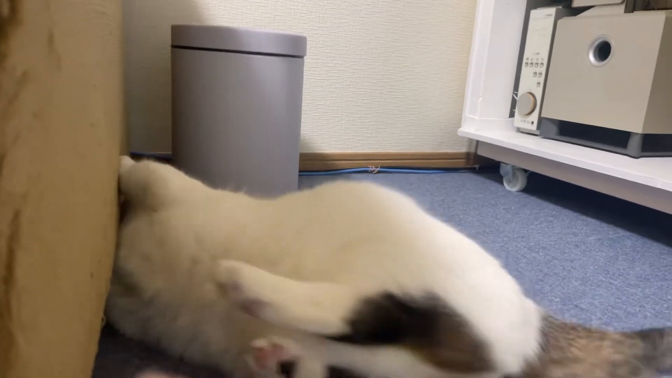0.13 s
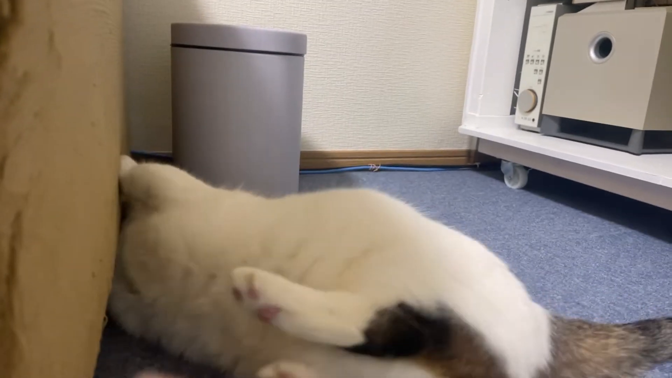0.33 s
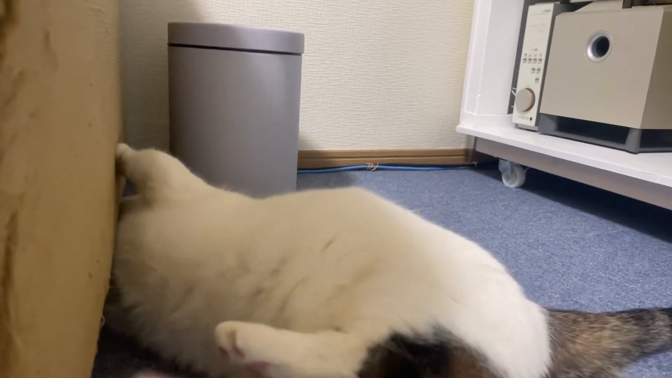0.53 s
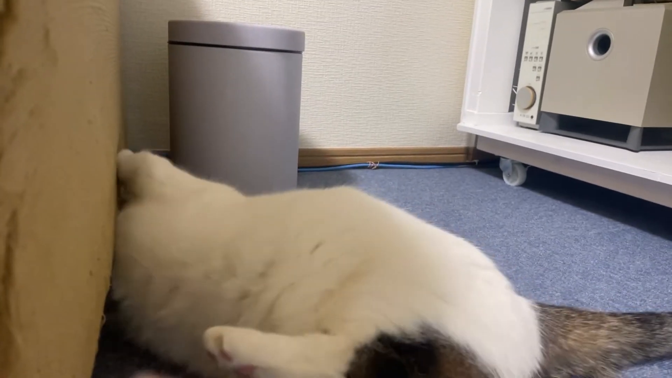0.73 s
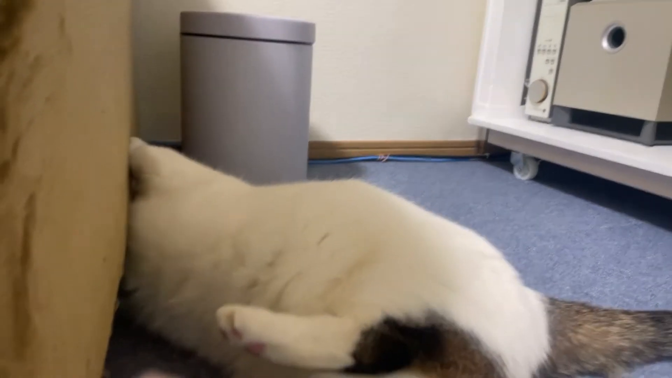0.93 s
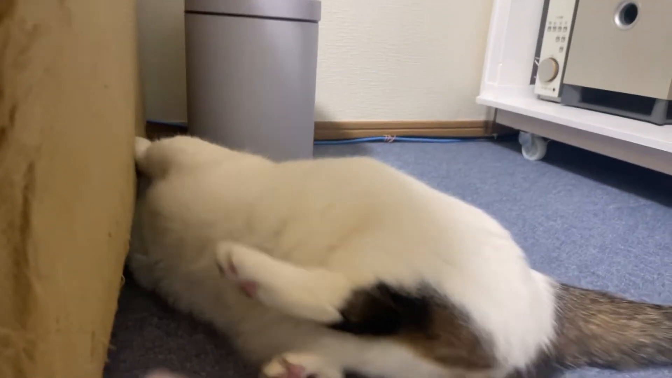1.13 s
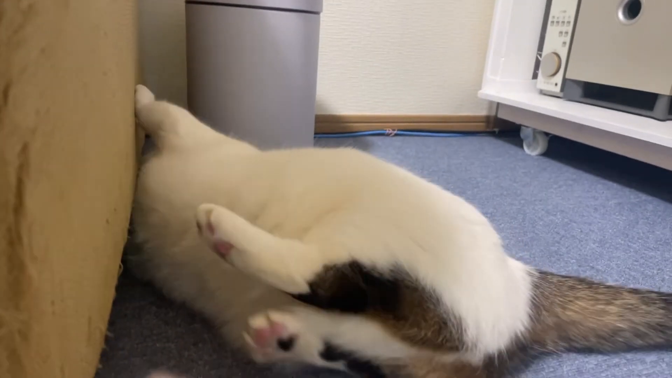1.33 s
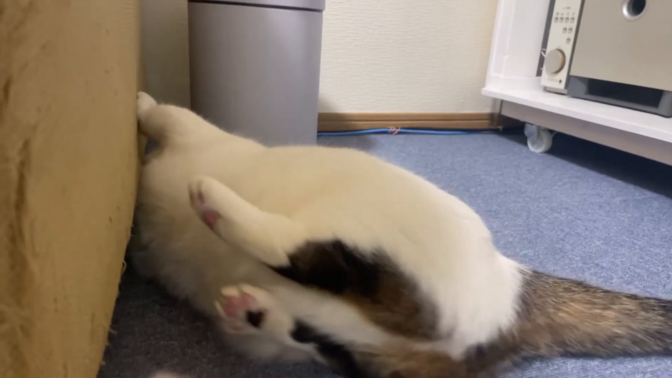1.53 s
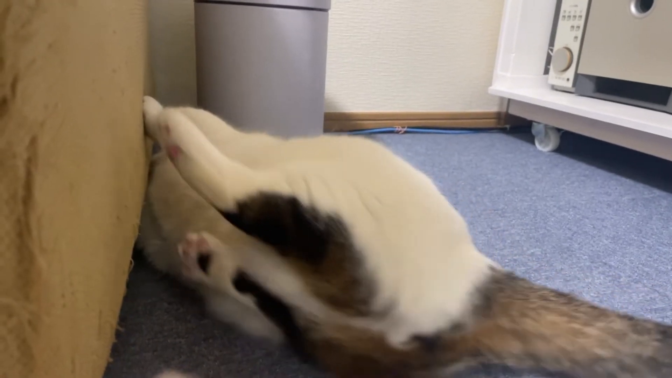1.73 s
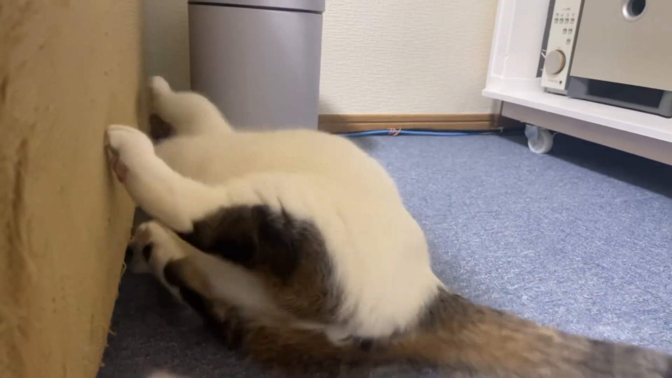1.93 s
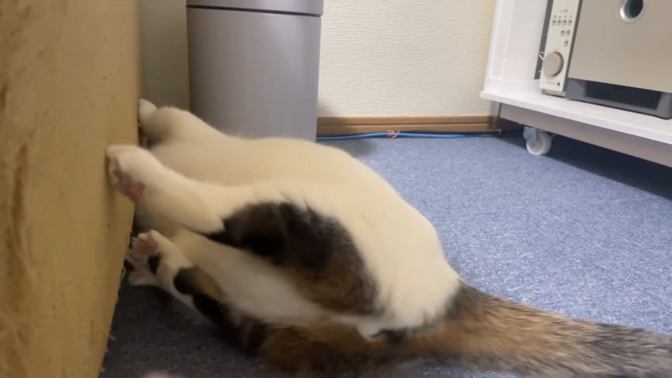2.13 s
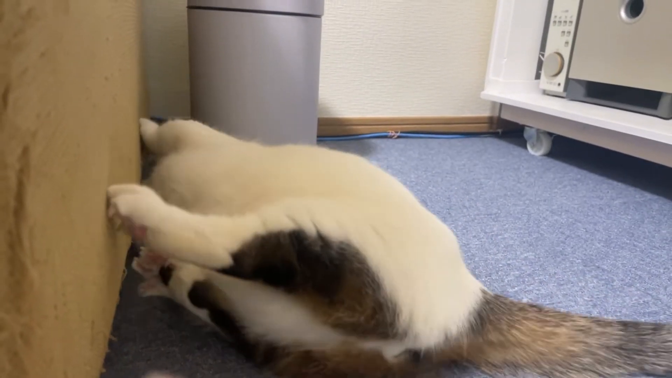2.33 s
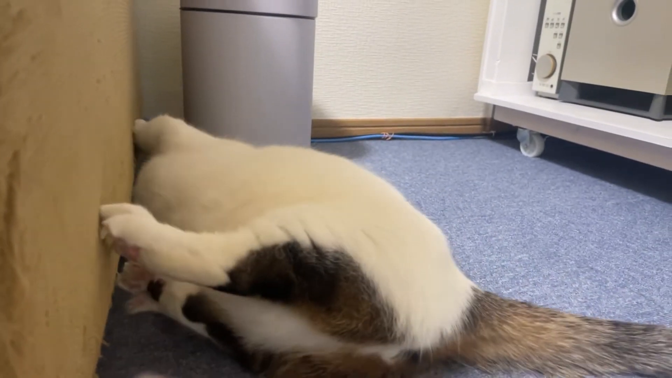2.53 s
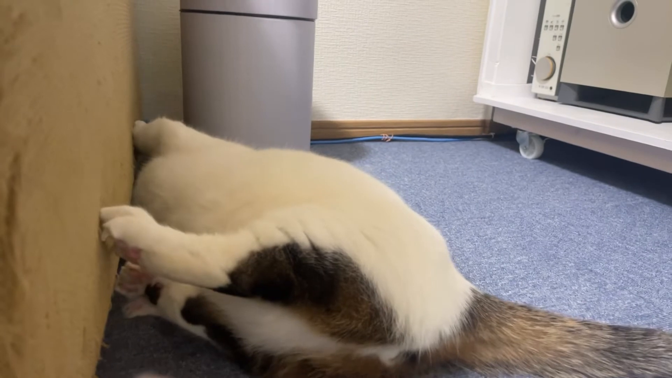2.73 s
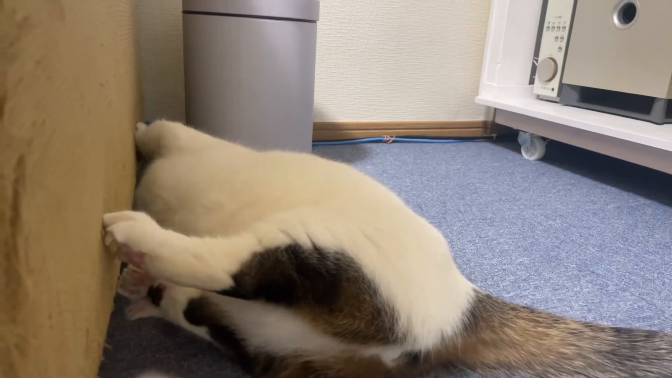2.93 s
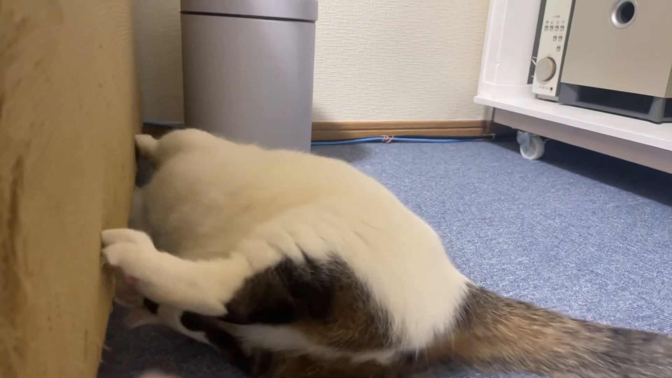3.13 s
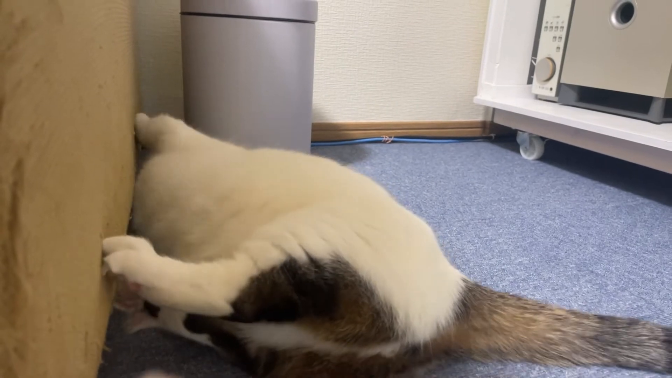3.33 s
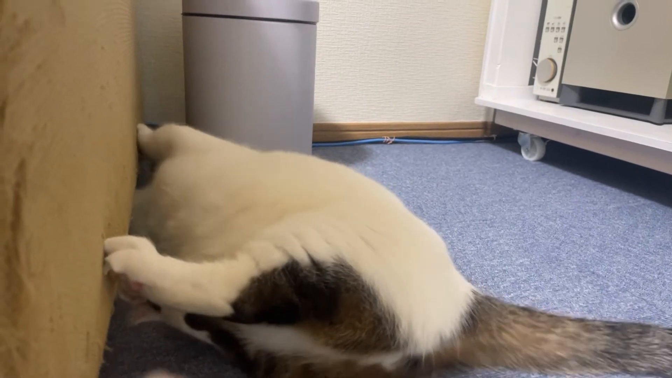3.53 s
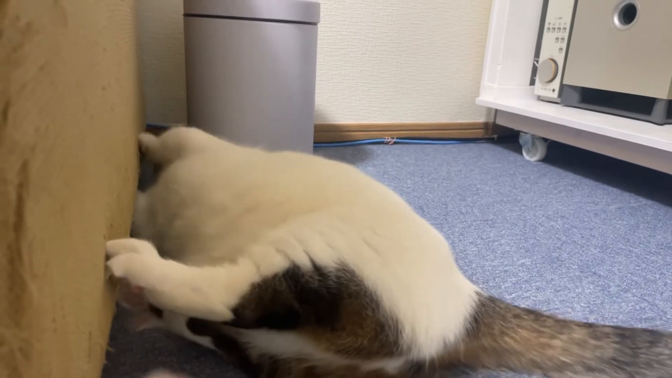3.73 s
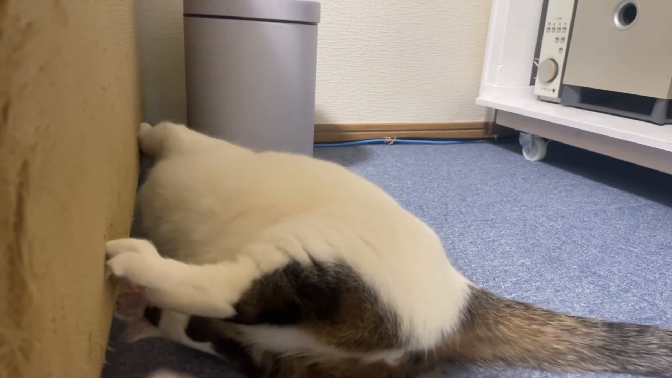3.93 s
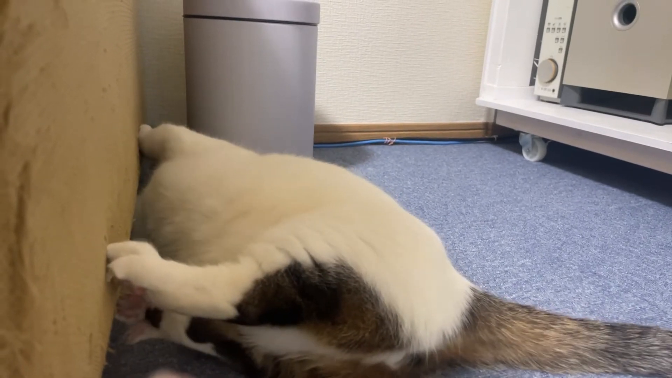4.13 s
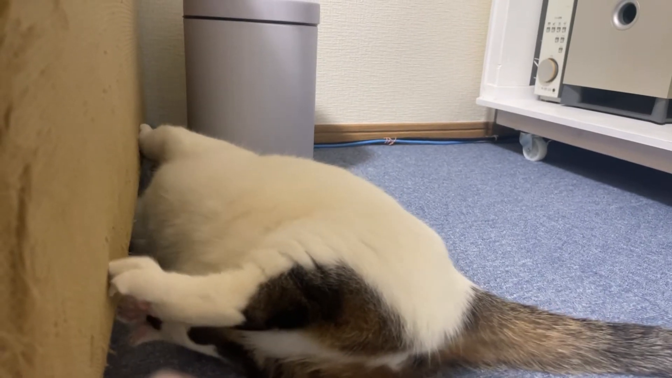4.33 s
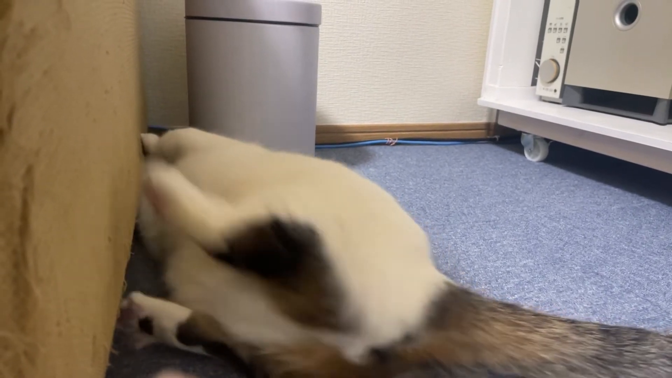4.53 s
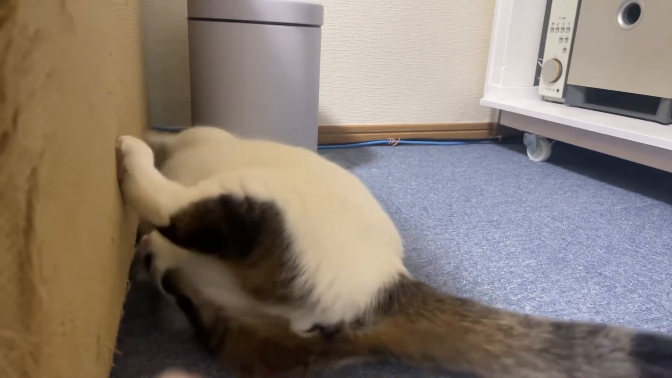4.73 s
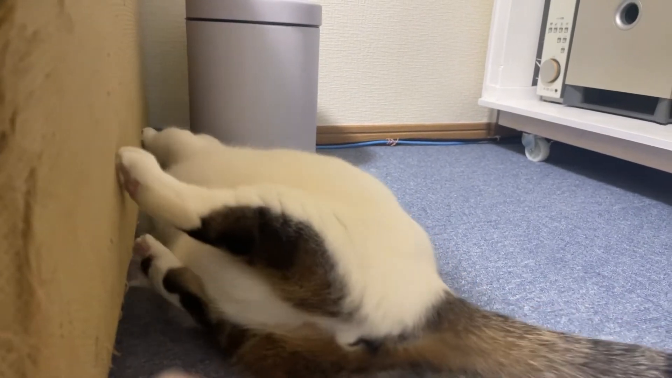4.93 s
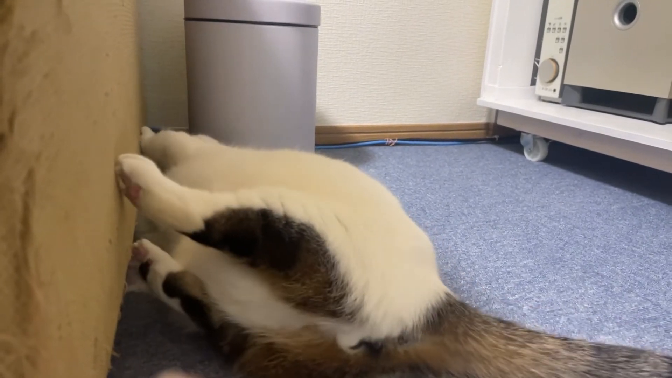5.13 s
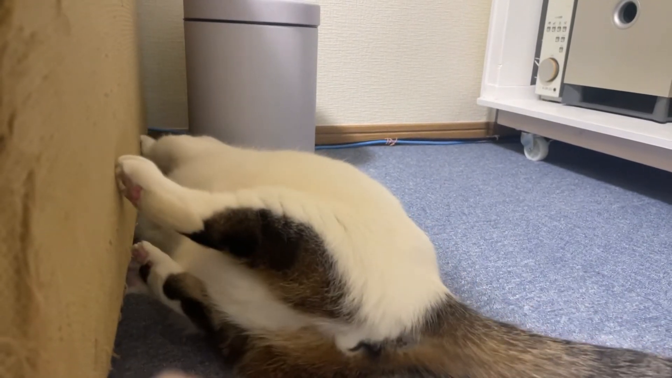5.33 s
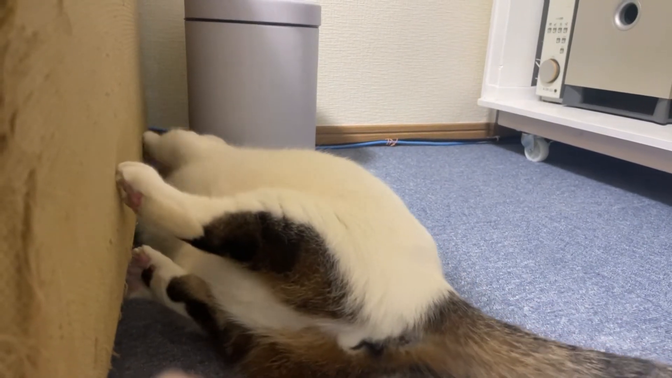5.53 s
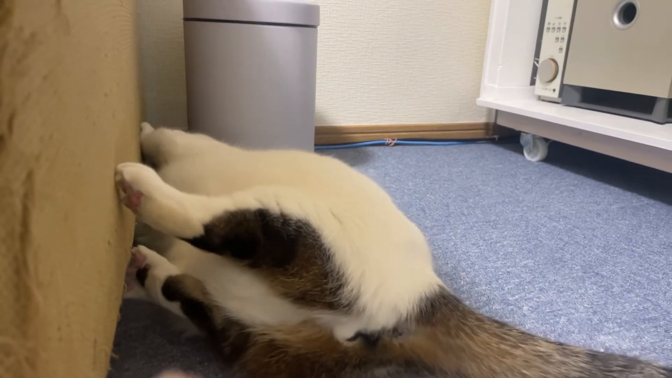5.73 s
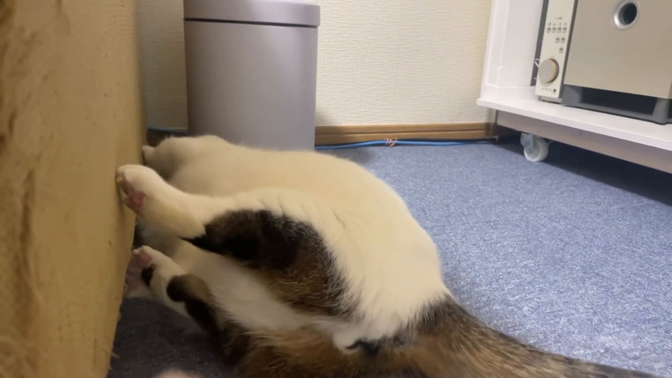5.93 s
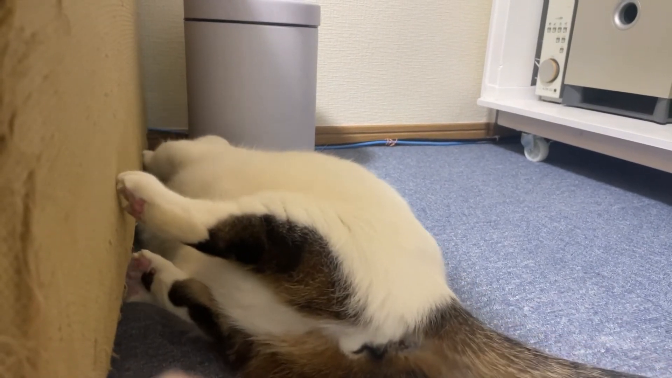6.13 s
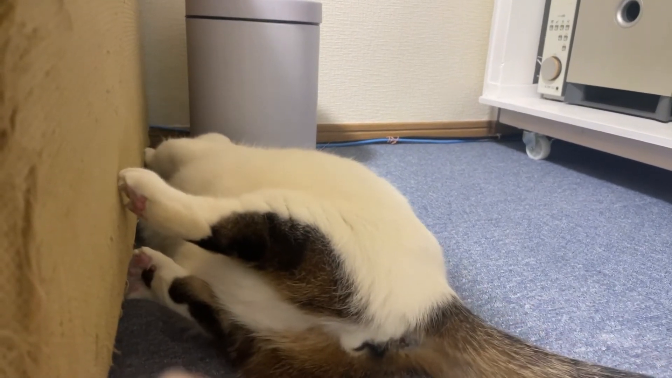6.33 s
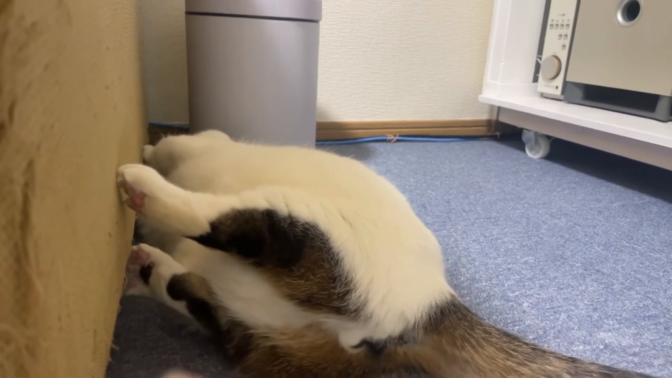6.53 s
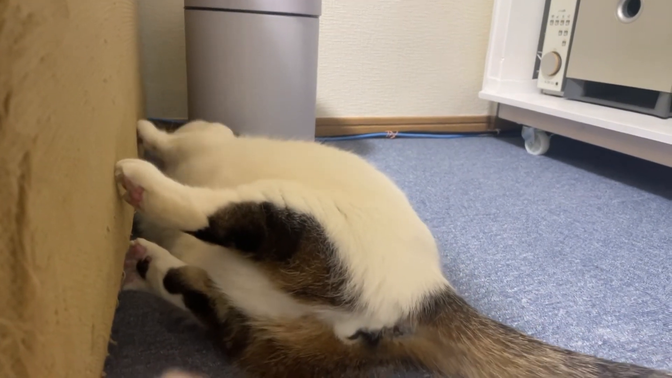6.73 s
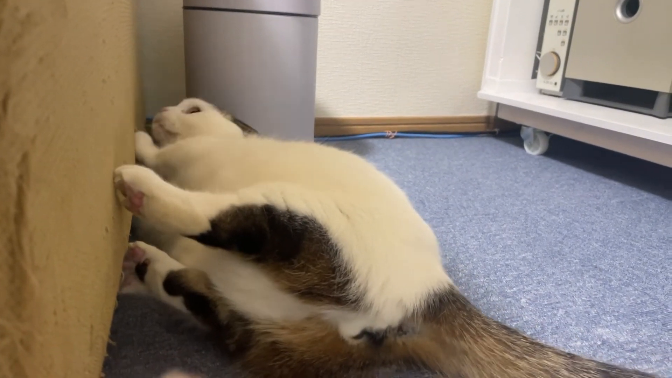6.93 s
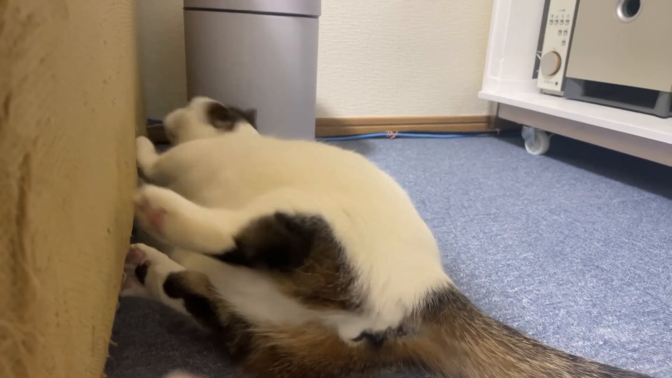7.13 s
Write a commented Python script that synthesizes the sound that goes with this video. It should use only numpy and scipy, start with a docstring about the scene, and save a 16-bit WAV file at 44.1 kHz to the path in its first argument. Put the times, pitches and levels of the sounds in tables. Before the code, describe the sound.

Soft fur rustles, short claw scratches and a few paw knocks against a cardboard box, with a steady low hum behind.

```python
"""A cat lying on carpet pushes, scratches and taps at a soft cardboard wall in a small quiet room.
Fur and pads rustle over the fibres, and claws drag in short strokes that set the board murmuring.
Paws knock the panel with a claw click on top and a thud below; the cat's weight shakes the floor.
Behind it lie soft room air and an appliance that hums low while its electronics whine faintly."""
import sys
import numpy as np
from scipy import signal
from scipy.fft import rfft, irfft, next_fast_len
from scipy.io import wavfile

SR = 44100
rng = np.random.default_rng(int(sys.argv[2]) if len(sys.argv) > 2 else 0)


def persist_wave(psi):
    """Save psi, clipped to +-1, as 16-bit WAV."""
    counts = np.round(np.clip(psi, -1, 1) * 32767).astype(np.int16)
    wavfile.write(sys.argv[1], SR, np.atleast_2d(counts).T)


N = 317079

# tone of the room air and hiss: frequency_hz, level_db
AIR_SPECTRUM = [(15, -19), (25, -25), (48, -9), (75, -32), (104, -21), (152, 1.5), (340, -5), (970, -15.5),
                (2300, -21), (2490, -19), (3830, -26), (4750, -64), (6210, -29.5), (9050, -36.5),
                (12500, -34), (15500, -34)]
# steady appliance hums: pitch_hz, level_db
HUMS = [(99.9, -50.5), (119.9, -63)]
# motor drones, the broader the more restless: pitch_hz, breadth_hz, level_db
DRONES = [(57.6, 2.7, -69), (157.7, 15, -65), (212.8, 36, -64)]
# electronic whine, overtones of the buzz rate: harmonic, level_db
WHINE_PARTIALS = [(56, -89), (67, -90), (68, -80), (69, -84), (70, -88), (72, -87), (77, -90), (79, -82),
                  (80, -84), (81, -89), (86, -88), (88, -85), (90, -85), (92, -88), (99, -88), (101, -90),
                  (102, -88), (103, -84)]
# floor rumble under the cat's weight: time_s, level_db
RUMBLE_CURVE = [(0.0, -51), (0.36, -58.5), (1.16, -58), (1.24, -48.5), (1.56, -59.5), (1.79, -54.5),
                (1.87, -43), (1.97, -43.5), (2.07, -57), (2.17, -52.5), (2.8, -64), (3.28, -52.5),
                (4.08, -58), (4.41, -54), (4.6, -58), (4.73, -40), (4.88, -57), (5.02, -53), (5.3, -61),
                (6.01, -61.5), (7.19, -60.5)]
# soft bumps of the body against the wall: peak_s, pitch_hz, level_db, length_s
BODY_BUMPS = [(1.243, 80, -56, 0.11), (1.892, 269, -48, 0.029), (1.915, 169.4, -37.5, 0.03),
              (2.19, 162, -50.5, 0.042), (3.73, 85, -54, 0.056), (4.624, 58.4, -43, 0.023),
              (4.722, 124, -32.5, 0.013), (4.729, 79, -46, 0.067)]
# low resonances of floor and wall: pitch_hz, gain_db, t60_s
THUD_MODES = [(74, -38, 0.13), (121, 14.5, 0.16), (178.6, 16.5, 0.069), (237, 15.5, 0.033)]
# boxy resonances of the cardboard: pitch_hz, gain_db, t60_s
PANEL_MODES = [(350, -7.5, 0.016), (424, -2, 0.024), (492, -4.5, 0.034), (559.6, -9, 0.05),
               (652, -11.5, 0.042), (821, -9, 0.021), (980, -13, 0.028), (1154, -14.5, 0.018),
               (1540, -11, 0.0093), (1850, -11, 0.0076)]
# tone of rustle and scratches as heard, bright near 5.5 kHz, steep fall above: frequency_hz, level_db
RUSTLE_SPECTRUM = [(650, -26), (1100, -7), (1390, -14), (2230, -8), (2410, -6.5), (2610, -5), (3720, -4.5),
                   (4150, -4), (4590, -2.5), (5480, 2), (6120, -4.5), (6500, -9.5), (7100, -23),
                   (8910, -33.5), (12300, -26), (15500, -30)]
# fur and pads rubbing along: peak_s, swell_s, fade_s, rustle_db, panel_db, rasp_over_rustle_db
FUR_RUBS = [(0.0, .02, 0.042, -53.5, -55, -20), (0.18, 0.11, 0.11, -57.5, -65, -18),
            (0.5, 0.23, 0.46, -66, -69, -28), (0.74, 0.018, 0.024, -65, -59, -25),
            (0.95, 0.078, 0.18, -56.5, -66.5, -39), (1.06, 0.055, 0.33, -62.5, -69, -37),
            (1.205, 0.015, 0.028, -50.5, -48.5, -37), (1.3, 0.02, 0.076, -62, -65.5, -28),
            (1.36, 0.02, 0.017, -60.5, -77, -35), (1.46, 0.082, 0.15, -55.5, -73, -40),
            (1.7, 0.11, 0.14, -56.5, -63, -21), (1.89, 0.086, 0.051, -50.5, -55.5, -9.5),
            (1.98, 0.026, .04, -62.5, -63, -20), (2.141, 0.12, 0.52, -54.5, -65.5, -12.5),
            (2.42, 0.24, 0.2, -88, -66.5, -30), (2.6, 0.006, 0.037, -67, -67, -29),
            (2.74, 0.014, 0.014, -60.5, -66, -29), (2.84, 0.035, 0.017, -62, -71, -20),
            (2.981, 0.089, 0.067, -54.5, -66, -24), (3.2, 0.03, 0.026, -52.5, -65, -27),
            (3.28, 0.03, 0.039, -55.5, -57.5, -28), (3.55, 0.19, 0.26, -60, -84, -24),
            (3.74, 0.075, 0.072, -61.5, -62, -16), (3.88, 0.026, 0.028, -59.5, -58.5, -15),
            (4.15, .025, 0.047, -60, -78, -10.5), (4.31, 0.044, 0.039, -64, -66, -20),
            (4.36, 0.012, 0.015, -60, -73, -18), (4.39, 0.025, 0.038, -57, -65, -18),
            (4.435, 0.012, 0.015, -59, -71, -27), (4.52, 0.3, 0.079, -64, -68, -16),
            (4.705, 0.0038, 0.091, -55.5, -52, -15), (4.97, 0.12, 0.084, -51, -54.5, -16.5),
            (5.13, 0.021, 0.017, -62, -73, -26), (5.3, 0.092, 0.44, -62, -79, -34),
            (5.48, 0.1, 0.032, -57.5, -70, -30), (5.54, 0.0077, 0.034, -58, -56, -33),
            (5.607, 0.018, 0.011, -53.5, -56.5, -40), (5.67, 0.017, 0.043, -61, -63, -17),
            (5.85, 0.11, 0.17, -62, -81, -31), (6.03, 0.075, 0.057, -62.5, -75, -12),
            (6.73, 0.081, 0.06, -59.5, -62.5, -18), (6.9, 0.068, 0.12, -68, -82, -16),
            (7.11, 0.061, 0.048, -62, -71, -19)]
# dry bright ticks of fine fibres snapping: start_s, level_db
FIBRE_TICKS = [(0.2329, -64), (1.1862, -62), (1.2979, -78), (1.6571, -65), (1.8128, -58), (1.8696, -59),
               (1.915, -56), (2.9866, -59), (3.266, -69), (3.2904, -67), (3.8731, -61), (4.4874, -71),
               (4.5321, -69), (5.5478, -65), (5.6017, -66), (5.668, -62)]
# the board giving once under a firm pad: peak_s, pitch_hz, level_db, length_s
PAD_PATS = [(0.324, 696, -56, .002), (0.542, 600, -45, .002), (0.569, 600, -46, .002),
            (0.636, 700, -48, .002), (0.6555, 790, -40, 0.0014), (0.729, 694, -51, 0.0022),
            (0.849, 604, -47.5, 0.0017), (1.404, 700, -46, 0.0018), (1.471, 700, -44, .002),
            (1.544, 700, -44, .002), (2.1013, 715, -33, 0.0011), (2.425, 600, -46.5, 0.0024),
            (3.253, 600, -45, 0.0023), (4.7032, 393, -19, 0.0018), (5.538, 800, -52, 0.0013),
            (5.6707, 816, -42, .0015)]
# claws snagging and dragging: start_s, scratch_db, panel_db, length_s
CLAW_STROKES = [(0.008, -57, -70, 0.0025), (0.18, -47.5, -68, 0.011), (0.208, -53, -62, 0.006),
                (0.226, -59, -61, 0.034), (0.323, -57, -74, 0.044), (0.447, -58.5, -60.5, 0.038),
                (0.513, -58.5, -59, 0.061), (0.544, -59, -63, 0.0048), (0.568, -47.5, -55, 0.0044),
                (0.576, -51, -55, 0.0048), (0.583, -52, -55, 0.0046), (0.652, -57, -52, 0.0064),
                (0.713, -56, -70, 0.004), (0.724, -58, -67, 0.013), (0.748, -51, -56, 0.0036),
                (0.848, -57.5, -67, 0.057), (1.022, -57.5, -58, 0.056), (1.193, -38, -52, 0.0054),
                (1.281, -53, -61, 0.01), (1.296, -47.5, -49.5, 0.0071), (1.4, -57, -50.5, 0.015),
                (1.449, -43.5, -48, 0.0068), (1.47, -55, -58, 0.01), (1.532, -52, -64, 0.004),
                (1.54, -49, -52, 0.0086), (1.598, -47.5, -49, 0.0066), (1.631, -58, -57, 0.013),
                (1.658, -50.5, -58, 0.022), (1.748, -48, -51.5, 0.022), (1.814, -48.5, -51, 0.013),
                (1.874, -48, -79, 0.016), (1.912, -50.5, -56, 0.02), (2.001, -54.5, -56, 0.011),
                (2.093, -61, -53, 0.0091), (2.166, -49, -75, 0.0069), (2.262, -50.5, -56, 0.015),
                (2.285, -72, -62, 0.014), (2.327, -57, -59, 0.014), (2.43, -52.5, -55, 0.0091),
                (2.461, -54, -60, 0.0095), (2.499, -68, -55.5, 0.0089), (2.51, -60.5, -78, 0.039),
                (2.601, -48, -62, 0.0044), (2.613, -49, -67, 0.0056), (2.639, -73, -57.5, 0.0071),
                (3.092, -59, -68, 0.065), (3.125, -54, -50, 0.0071), (3.167, -53, -67, 0.0088),
                (3.181, -51.5, -57, 0.0061), (3.201, -50, -56, 0.0034), (3.207, -54, -49.5, 0.008),
                (3.236, -54, -60, 0.003), (3.254, -61, -57.5, 0.01), (3.263, -51, -61, 0.0041),
                (3.277, -41.5, -61, 0.002), (3.3, -57, -57, 0.004), (3.328, -48, -52, 0.003),
                (3.723, -58, -58.5, 0.022), (3.749, -53.5, -53, 0.018), (3.851, -54, -60, 0.006),
                (3.865, -56.5, -66, 0.025), (4.046, -58, -64, 0.0072), (4.06, -59, -63.5, 0.031),
                (4.124, -63, -95, 0.032), (4.302, -57, -71, 0.004), (4.314, -52.5, -57, 0.013),
                (4.425, -44, -63, 0.0055), (4.608, -58.5, -75, 0.1), (4.698, -42.5, -43, 0.014),
                (4.884, -59, -79, 0.0053), (5.109, -56.5, -69, 0.018), (5.225, -56, -63, 0.0094),
                (5.438, -65, -66, 0.0094), (5.482, -55, -58, 0.011), (5.533, -49, -58, 0.005),
                (5.544, -57, -55, 0.022), (5.667, -47, -53, 0.0068), (6.014, -55, -80, 0.0097),
                (6.711, -54.5, -70, 0.024), (6.746, -57, -63, 0.025), (6.87, -58.5, -87, 0.038),
                (6.981, -58.5, -83, 0.0082)]
# paw knocks on the panel: start_s, panel_db, dullness_db_per_octave, click_db, thud_db, click_hz
PAW_KNOCKS = [(0.179, -52.5, -11.5, -38, -85, 1910), (0.542, -49, -3, -49, -79, 2800),
              (0.568, -50, 2, -44, -72, 3000), (0.578, -52, -3, -42, -75, 3000),
              (0.586, -51, -5, -44, -67, 3000), (0.635, -46, 3, -55, -75, 1500),
              (0.655, -49, 1, -46, -82, 2000), (0.731, -45, 3, -57, -77, 2000),
              (0.848, -50, 6, -44, -66, 2500), (1.023, -48, -2, -43, -83, 1720),
              (1.195, -37.5, -2.5, -24, -72, 2800), (1.212, -37, 8, -51, -57.5, 1500),
              (1.226, -40, 2, -57, -62, 1500), (1.301, -44.5, -1, -53, -71, 2000),
              (1.402, -43, 6, -32.5, -61.5, 2220), (1.469, -56, -6, -36, -68, 2500),
              (1.753, -36, 1.5, -56, -69, 2000), (2.003, -43, 8, -36.5, -60, 2200),
              (2.0996, -40, -5, -22.5, -59, 2820), (2.427, -41, 5, -52, -75, 2178),
              (3.113, -45.5, -2.5, -44, -83, 1700), (3.184, -36, 5, -59, -75, 2000),
              (3.249, -40, 7, -54, -79, 2000), (3.28, -45, -4, -50, -66, 1800),
              (3.427, -56, -6, -38, -82, 2400), (4.422, -54, 2, -20.5, -75, 3740),
              (4.428, -52, -3, -36, -68, 3140), (4.615, -50, -2, -58, -60, 2000),
              (4.6985, -26, -2.5, -10.5, -44, 2000), (4.7101, -30, 0, -41, -63, 1200),
              (5.46, -43, -2, -55, -62.5, 2000), (5.603, -45, 2, -32, -66, 2250),
              (5.669, -53, -3, -28, -85, 2240), (6.748, -51, 1, -61, -82, 2000)]

AIR_DB, BUZZ_HZ, WHINE_TRIM_DB = -63.5, 59.94, 0.3
ROOM_T60_S, ROOM_DB, ROOM_LOW_CUT_HZ = 0.17, -14.5, 470
REST_RUSTLE_DB, REST_PANEL_DB, REST_RASP_OVER_RUSTLE_DB = -74.5, -72, -20   # the body always stirs a little
WOBBLE_DB, WOBBLE_PER_S, WOBBLE_EDGES_HZ = 2, 26.5, [1240, 3000, 4380, 6740]
GRIT_PER_S, GRIT_GAIN = 250, 0.52   # separate catches within a rub
PLUCKS_PER_S, PLUCK_DB, PLUCK_RANGE_HZ, PLUCK_T60_S = 160, -10, [4870, 6040], 0.011
TICK_RISE_S, TICK_BAND_HZ = 0.0021, [6400, 13000]
SNAG_DB, SNAG_DELAY_S = 12.5, 0.001057   # the first fibre of a stroke snaps harder than the rest
PAT_GLIDE, CLICK_RISE_CYCLES = 0.16, 0.72


def from_db(db):
    """Decibels to gain."""
    return 10 ** (np.asarray(db) / 20)


def unit_rms(x):
    """Scales x to rms 1."""
    return x / np.sqrt(np.mean(x ** 2) + 1e-20)


def filtered(x, order, hz, kind):
    """Butterworth low, high or band pass."""
    return signal.sosfilt(signal.butter(order, hz, kind, fs=SR, output="sos"), x)


def drift(per_s):
    """A slow random wander of rms 1, turning about per_s times a second."""
    pole = np.exp(-80 * np.pi * per_s / SR)
    slow = signal.lfilter([1], [1, -2 * pole, pole * pole], rng.standard_normal(N // 40 + 2002))[2000:]
    return np.interp(np.arange(N) / 40, np.arange(len(slow)), unit_rms(slow - slow.mean()))


def coloured(x, spectrum):
    """Gives x the tone of a spectrum table, at rms 1."""
    hz, level_db = np.transpose(spectrum)
    size = next_fast_len(N)
    bins_hz = np.maximum(np.arange(size // 2 + 1) * SR / size, 1)
    gain = from_db(np.interp(np.log(bins_hz), np.log(hz), level_db))
    return unit_rms(irfft(rfft(x, size) * gain, size)[:N])


def ring(x, hz, t60_s):
    """A resonator: a unit click sets off a dying sine of height 1."""
    pole, angle = from_db(-60 / (t60_s * SR)), 2 * np.pi * hz / SR
    return signal.lfilter([0, np.sin(angle)], [1, -2 * pole * np.cos(angle), pole * pole], x + 1e-18)


def room_air():
    """A steady bed of soft, dark noise."""
    return from_db(AIR_DB) * coloured(rng.standard_normal(N), AIR_SPECTRUM)


def appliance():
    """Steady hums, wavering motor drones and a thin whine locked to the buzz rate."""
    t = np.arange(N) / SR
    out = np.zeros(N)
    for hz, level_db in HUMS:
        out += np.sqrt(2) * from_db(level_db + 0.5 * drift(per_s=0.72)) * np.sin(2 * np.pi * hz * t)
    for hz, breadth_hz, level_db in DRONES:
        out += from_db(level_db) * unit_rms(ring(rng.standard_normal(N), hz, t60_s=4.0 / breadth_hz))
    for harmonic, level_db in WHINE_PARTIALS:
        phase = 2 * np.pi * harmonic * BUZZ_HZ * t + rng.uniform(0, 2 * np.pi)
        out += np.sqrt(2) * from_db(level_db + WHINE_TRIM_DB) * np.sin(phase)
    return out


def room_tail(x):
    """A short, dense reverb with softened treble; carpet and soft board soak up its lows."""
    t = np.arange(round(.4 * SR)) / SR
    tail = rng.standard_normal(len(t)) * from_db(-60 * t / ROOM_T60_S) * (t > .004)
    tail = signal.lfilter([.4], [1, -.6], tail)   # gentle treble roll-off
    tail = filtered(tail, 1, ROOM_LOW_CUT_HZ, "high")
    return signal.fftconvolve(x, tail / np.sqrt(np.sum(tail ** 2)))[:N]


def floor_rumble():
    """The cat's weight shakes the floor in swells of deep noise."""
    level_db = np.interp(np.arange(N) / SR, *np.transpose(RUMBLE_CURVE))
    return from_db(level_db) * unit_rms(filtered(rng.standard_normal(N), 2, [42, 88], "band"))


def body_bumps():
    """Each soft push on the wall swells and fades at one low pitch."""
    t = np.arange(N) / SR
    return sum(from_db(db) * np.exp(-((t - peak_s) / length_s) ** 2) * np.sin(2 * np.pi * hz * (t - peak_s))
               for peak_s, hz, db, length_s in BODY_BUMPS)


def grains(per_s, spread_db):
    """Fibres snapping free: random clicks of uneven size over a bed of noise."""
    sizes = from_db(spread_db * np.minimum(rng.exponential(1, N), 5)) * rng.choice([-1, 1], N)
    clicks = sizes * (rng.random(N) < per_s / SR)
    return unit_rms(clicks) + .5 * rng.standard_normal(N)


def fibre_plucks():
    """Stiff fibres twang in a rub: uneven plucks, each ringing briefly at one of six pitches."""
    sizes = from_db(4.1 * np.minimum(rng.exponential(1, N), 4))
    plucks = sizes * (rng.random(N) < PLUCKS_PER_S / SR)
    pitch_index = rng.integers(0, 6, N)
    pitches_hz = np.geomspace(*PLUCK_RANGE_HZ, 6)
    twangs = sum(ring(plucks * (pitch_index == k), hz, PLUCK_T60_S) for k, hz in enumerate(pitches_hz))
    return unit_rms(filtered(twangs, 2, PLUCK_RANGE_HZ, "band"))


def pressure_wobble(x):
    """Pressure wobbles along a rub; coarse and fine fibres feel it differently, band by band."""
    lows = [filtered(x, 2, hz, "low") for hz in WOBBLE_EDGES_HZ]
    bands = np.diff([0 * x, *lows, x], axis=0)
    shared = 0.66 * drift(WOBBLE_PER_S)
    return sum(band * from_db(WOBBLE_DB * (shared + drift(WOBBLE_PER_S))) for band in bands)


def rub_envelopes():
    """Rustle, panel and rasp gains: each rub swells and fades on top of the stirring at rest."""
    t = np.arange(0, N, 20) / SR
    peak_s, swell_s, fade_s, rustle_db, panel_db, rasp_db = np.transpose(FUR_RUBS)[:, :, None]
    width_s = np.maximum(np.where(t < peak_s, swell_s, fade_s), .003)
    swells = np.exp(-((t - peak_s) / width_s) ** 2)
    layers = [(REST_RUSTLE_DB, rustle_db), (REST_PANEL_DB, panel_db),
              (REST_RUSTLE_DB + REST_RASP_OVER_RUSTLE_DB, rustle_db + rasp_db)]
    powers = [from_db(rest) ** 2 + np.sum((from_db(db) * swells) ** 2, axis=0) for rest, db in layers]
    return [np.interp(np.arange(N) / SR, t, np.sqrt(power)) for power in powers]


def fur_rustle(rustle_gain, rasp_gain):
    """Fur and pads brush the fibres: a gritty rustle with tiny twangs and a thin, high rasp."""
    friction = grains(3000, spread_db=1.0) + GRIT_GAIN * grains(GRIT_PER_S, spread_db=1.5)
    rasp = unit_rms(filtered(grains(4000, spread_db=3.0), 2, [6300, 7600], "band"))
    rustle = coloured(friction, RUSTLE_SPECTRUM) + from_db(PLUCK_DB) * fibre_plucks()
    return pressure_wobble(rustle_gain * rustle + rasp_gain * rasp)


def fibre_ticks():
    """Fine fibres snap, each with a tiny swell of bright noise."""
    start_s, level_db = np.transpose(FIBRE_TICKS)
    triggers = np.zeros(N)
    triggers[np.round(start_s * SR).astype(int)] = from_db(level_db)
    age = np.arange(round(.04 * SR)) / (TICK_RISE_S * SR)
    envelope = signal.fftconvolve(triggers, age * np.exp(1 - age))[:N]
    return filtered(envelope * rng.standard_normal(N), 2, TICK_BAND_HZ, "band")


def pad_pats():
    """The board gives under a pad with a falling blip: short waves leave the board first."""
    out, t = np.zeros(N), np.arange(-300, 300) / SR
    for peak_s, hz, db, length_s in PAD_PATS:
        i = round(peak_s * SR) - 300
        phase = 2 * np.pi * hz * t * (1 - PAT_GLIDE * t / length_s)
        out[i:i + len(t)] += from_db(db) * np.exp(-(t / length_s) ** 2) * np.sin(phase)
    return out


def drag_envelopes():
    """Scratch and panel gains: a claw catches at once, then fades over the drag as it slides free."""
    scratch, panel = np.zeros(N), np.zeros(N)
    for start_s, scratch_db, panel_db, length_s in CLAW_STROKES:
        i = round(start_s * SR)
        t = np.arange(min(round(.15 * SR), N - i)) / SR
        shape = (1 - np.exp(-t / .0006)) * np.exp(-(t / max(length_s, .002)) ** 2)
        scratch[i:i + len(t)] += from_db(scratch_db) * shape
        panel[i:i + len(t)] += from_db(panel_db) * shape
    return scratch, panel


def panel_murmur(catches):
    """Friction keeps the cardboard resonating, with a shorter ring than a knock leaves."""
    return unit_rms(sum(from_db(db) * (-1) ** k * ring(catches, hz, t60_s * 0.61)
                        for k, (hz, db, t60_s) in enumerate(PANEL_MODES)))


def claw_scratch(catches):
    """A claw slips from fibre to fibre, with one hard snag at the head of each stroke."""
    snag_s = np.transpose(CLAW_STROKES)[0] + SNAG_DELAY_S
    snags = np.zeros(N)
    snags[np.round(snag_s * SR).astype(int)] = from_db(SNAG_DB)
    return coloured(catches + snags, RUSTLE_SPECTRUM)


def claw_clicks(times_s, click_db, click_hz):
    """The claw tip meets the surface: a rounded snap of about one millisecond."""
    out, t = np.zeros(N), np.arange(200) / SR
    for start_s, db, hz in zip(times_s, click_db, click_hz):
        i, age = round(start_s * SR), t * hz / CLICK_RISE_CYCLES
        envelope = (age * np.exp(1 - age)) ** 3
        out[i:i + len(t)] += from_db(db - 7) * envelope * np.sin(2 * np.pi * hz * t)
    return out


def strike(times_s, level_db, modes, dullness=0):
    """Each blow rings every mode a little differently; a broad soft pad favours the low modes."""
    at, out = np.round(times_s * SR).astype(int), np.zeros(N)
    scatter_db = 1.5 * rng.standard_normal((len(at), len(modes)))
    for k, (hz, gain_db, t60_s) in enumerate(modes):
        octaves_up = np.log2(hz / modes[0][0])
        blows = np.zeros(N)
        blows[at] = from_db(level_db + gain_db + scatter_db[:, k] - dullness * octaves_up)
        out += ring(blows, hz, t60_s) * (-1) ** k
    return out


def paw_knocks():
    """The claw clicks first, the panel answers just after, and the low thud builds last."""
    start_s, panel_db, dullness, click_db, thud_db, click_hz = np.transpose(PAW_KNOCKS)
    clicks = claw_clicks(start_s, click_db, click_hz)
    panel = strike(start_s + .001, panel_db, PANEL_MODES, dullness)
    thuds = strike(start_s + .00813, thud_db, THUD_MODES)
    return filtered(clicks + panel + thuds, 4, 4500, "low")   # muffled, with the top rolled off


def cat():
    """Rubs and scratches drive both fibres and panel; knocks, pats and ticks land on top."""
    rustle_gain, rub_panel_gain, rasp_gain = rub_envelopes()
    scratch_gain, drag_panel_gain = drag_envelopes()
    fur = fur_rustle(rustle_gain, rasp_gain)
    catches = grains(1800, spread_db=3.0)
    claws = scratch_gain * claw_scratch(catches)
    board = (rub_panel_gain + drag_panel_gain) * panel_murmur(catches)
    return fur + claws + board + paw_knocks() + pad_pats() + fibre_ticks()


def scene():
    """The cat up close with a touch of room, over dry low end, appliance and air."""
    close = cat()
    low_end = floor_rumble() + body_bumps()
    return (close + from_db(ROOM_DB) * room_tail(close) + low_end + appliance() + room_air())[None, :]


def record(dry):
    """Rolls off the deepest bass and cuts the very top steeply."""
    trimmed = filtered(dry, 2, 36, "high")
    return signal.sosfilt(signal.ellip(12, .5, 70, 15880, fs=SR, output="sos"), trimmed)


dry = scene()
out = record(dry)
persist_wave(out)
```